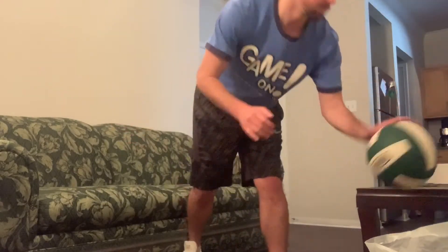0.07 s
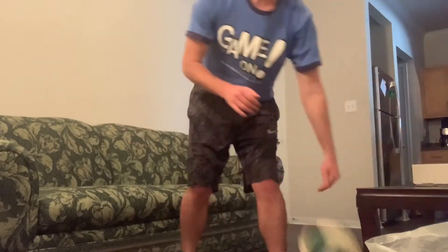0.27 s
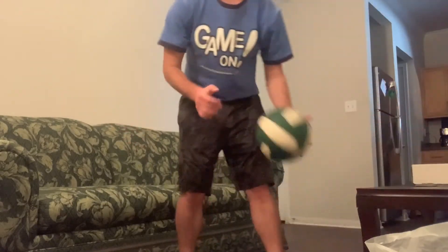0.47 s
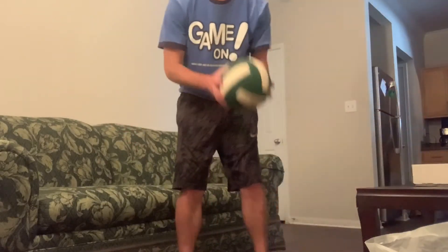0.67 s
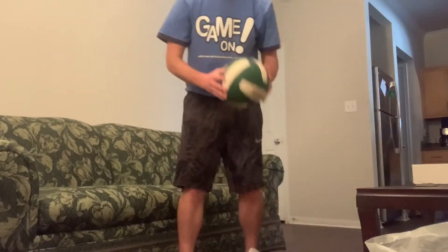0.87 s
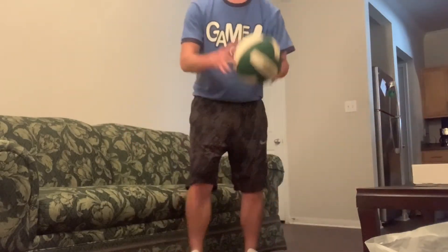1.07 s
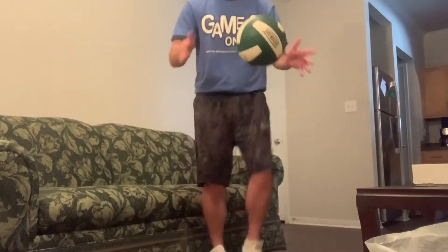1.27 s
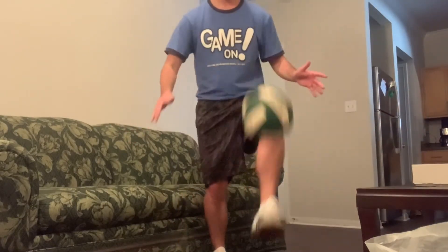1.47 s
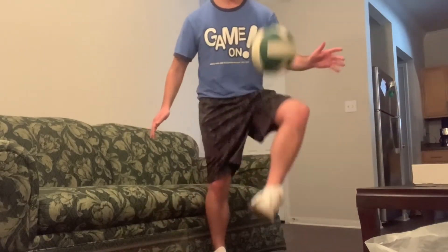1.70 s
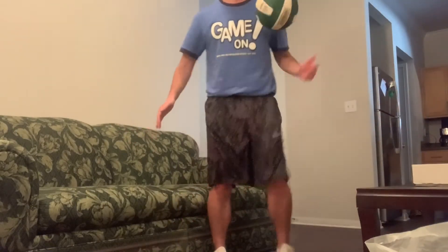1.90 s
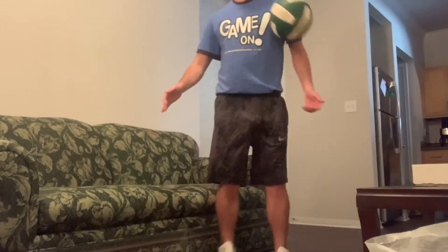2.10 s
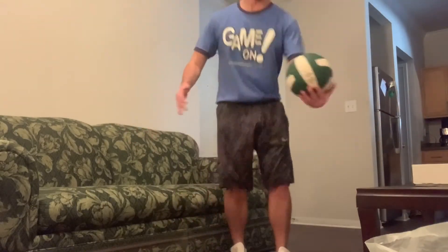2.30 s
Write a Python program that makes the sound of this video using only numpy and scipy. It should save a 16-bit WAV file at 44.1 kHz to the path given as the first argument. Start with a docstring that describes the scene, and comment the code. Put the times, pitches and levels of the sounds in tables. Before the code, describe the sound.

Ball bouncing once with a boomy thud, then slapping against hands and a knee indoors.

```python
"""Volleyball in a living room

The ball is dribbled on the floor, caught, tossed, bumped off a knee and caught again.
Each contact gives a slap, a thump that sags in pitch and a ring of the air in the ball; heavy ones
wake the room's boom. Palms and clothes rub on the cover; an appliance hums in the background."""
import sys
import numpy as np
from scipy import signal
from scipy.fft import rfft, irfft, next_fast_len
from scipy.io import wavfile

SR = 44100
rng = np.random.default_rng(int(sys.argv[2]) if len(sys.argv) > 2 else 0)


def unload_audio(sound):
    """Save the sound as a 16-bit wav file, at the path given as the first command line argument."""
    columns = np.transpose(np.atleast_2d(sound))
    # keep every value between -1 and 1, then stretch to whole-number steps
    steps = np.round(np.clip(columns, -1, 1) * 32767)
    wavfile.write(sys.argv[1], SR, steps.astype(np.int16))


N = 108045

# Frequencies in Hz of a contact's seven slap levels.
SLAP_BANDS_HZ = [200, 420, 750, 1250, 2300, 4600, 10000]


def amp(db):
    return 10 ** (np.asarray(db) / 20)


def unit_rms(x):
    return x / np.sqrt(np.mean(x ** 2) + 1e-20)


def curve_at(points, hz):
    """Interpolate (Hz, value) points on a log frequency axis."""
    points_hz, values = np.transpose(points)
    return np.interp(np.log(hz + 1), np.log(points_hz + 1), values)


def mix_in(out, start_s, x):
    """Add x to out from start_s on, cropped to the scene."""
    i = round(start_s * SR)
    x = x[..., max(-i, 0):N - i]
    out[:, max(i, 0):max(i, 0) + x.shape[-1]] += x


def room_noise(gain, size):
    """Stereo noise shaped by gain(hz): alike on both sides in the bass, partly alike above."""
    # Each row: frequency in Hz, left-right correlation.
    likeness = [(60, 1), (130, 0.9), (240, 0.92), (380, 0.18), (800, 0.3), (3000, 0.36), (7500, 0.55),
                (9000, .3), (11000, 0.697), (13000, 0.95), (15000, 1)]
    # Each row: frequency in Hz, lag of the left channel in seconds.
    left_lag = [(180, 0), (450, .001), (1100, .0009), (2350, .00085), (5150, .000777), (9000, .000745),
                (11200, .000714), (14600, .000685)]
    hz = np.fft.rfftfreq(size, 1 / SR)
    angle = np.arccos(np.clip(curve_at(likeness, hz), -1, 1)) / 2
    mid, side = rfft(rng.standard_normal((2, size))) * gain(hz) * [np.cos(angle), np.sin(angle)]
    left = (mid + side) * np.exp(-2j * np.pi * hz * curve_at(left_lag, hz))
    return irfft(np.array([left, mid - side]), size)


def background():
    """An appliance motor hums over the room's soft rush."""
    # Each row: frequency in Hz, rms level in dB.
    hum_tones = [(59.2, -57), (118.4, -64), (236.9, -66.5)]
    # Each row: frequency in Hz, relative level in dB.
    rush_spectrum = [(12, -13), (20, -7.5), (65, -0.5), (163, -24), (248, -8.5), (337, -14.5), (718, -19.5),
                     (1440, -32), (3740, -41), (4420, -42), (5230, -40.5), (14700, -54.5), (16000, -72)]
    rush_db = -53
    t = np.arange(N) / SR
    hum = sum(amp(db) * np.sqrt(2) * np.sin(2 * np.pi * hz * t + rng.uniform(0, 2 * np.pi))
              for hz, db in hum_tones)
    rush = room_noise(lambda hz: amp(curve_at(rush_spectrum, hz)), next_fast_len(N))[:, :N]
    return hum + amp(rush_db) * unit_rms(rush)


def rubs():
    """Skin and cloth brush the cover: short hisses that fade in the room."""
    # Each row: start, rise and hold in seconds, level in dB, centre in Hz, half-width in octaves.
    # In order: finger squeak, palm slide, shirt (two rows), forearm, shorts.
    strokes = [ (0.53, 0.0037, 0.0042, -56.5, 2410, .1), (0.754, 0.028, 0.047, -54, 7220, 0.77),
               (1.861, 0.034, .02, -55.5, 2200, 0.62), (1.871, .015, 0.011, -61.5, 7600, 0.37),
               (2.173, 0.0067, 0.027, -53.5, 6600, 0.35), (1.534, 0.0069, .005, -47.5, 3850, 0.17), ]
    t60_s = 0.373
    out, t = np.zeros((2, N)), np.arange(SR) / SR
    for start_s, rise_s, hold_s, db, centre_hz, width_oct in strokes:
        envelope = np.minimum(t / rise_s, 1) * amp(-60 * np.maximum(t - rise_s - hold_s, 0) / t60_s)
        hiss = room_noise(lambda hz: 1 / (1 + (np.log2((hz + 1) / centre_hz) / width_oct) ** 2), len(t))
        mix_in(out, start_s, amp(db) * envelope * unit_rms(hiss))
    return out


def boom(t):
    """The room's lowest standing wave swells as the thump dies, then hangs on."""
    mode_hz, rise_s, t60_s = 62.18, 0.18, 0.68
    swell = 1 - np.exp(-(t / rise_s) ** 4)
    return np.sin(2 * np.pi * mode_hz * t) * swell * amp(-60 * t / t60_s)


def ring(t, slap_spectrum, rise_s):
    """The air in the ball and the room ring as hard as the slap drives them; each tone wavers."""
    # Each row: frequency in Hz, relative level in dB, t60 in seconds.
    modes = [(286.5, -1, 0.66), (445, -8, 0.14), (524, -7.5, .45), (579, 5.5, 0.29), (705, 5.5, 0.32),
             (731, -8, 0.96), (910.4, 1, 0.4), (1025, -9, 0.2), (1136, -2, 0.36), (1226, -7, 0.45),
             (1506, -7, 0.47), (1525, -14.5, 0.13), (1889, -7.5, 0.57), (2250, -8, 0.35)]
    coupling_db, waver_rad = -4, 0.37
    knots_s = np.arange(0, 1, 0.025)
    out = np.zeros((2, len(t)))
    for hz, db, t60_s in modes:
        envelope = amp(coupling_db + db + curve_at(slap_spectrum, hz) - 60 * t / t60_s)
        for channel in out:
            drift = waver_rad * rng.standard_normal(len(knots_s)).cumsum()
            phase = np.interp(t, knots_s, drift) + rng.uniform(0, 2 * np.pi)
            channel += envelope * np.sin(2 * np.pi * hz * t + phase)
    return out * (1 - np.exp(-t / rise_s))


def tock(t, slap_db):
    """The first touch chirps down as the contact patch widens."""
    start_hz, decay_s, over_mids_db = 3100, 0.001854, 0.5
    fade = np.exp(-t / decay_s)
    envelope = amp(over_mids_db + np.mean(slap_db[2:5])) * 4 * fade * (1 - fade)
    return envelope * np.sin(2 * np.pi * start_hz * decay_s * (1 - fade))


def slap(t, slap_spectrum, rise_s):
    """The cover's smack, thrown back by near walls, then dying in the room."""
    # Colour common to all slaps. Each row: frequency in Hz, gain in dB.
    colour = [(40, -8.5), (110, -1.5), (280, -6.5), (345, -11), (440, 0.5), (700, -2), (900, -5),
              (1500, -5), (2000, -2), (2600, -5), (3500, -4), (4100, -4.5), (4900, -0.5), (5600, -1.5),
              (7500, 0), (10200, -3.5), (11200, -1.5), (12400, -6), (15000, -5.5)]
    # Each row: frequency in Hz, room t60 in seconds.
    room_t60 = [(100, 0.64), (250, 0.47), (600, 0.65), (1500, 0.61), (3000, 0.61), (5200, 0.66),
                (8000, 0.55), (14000, 0.41)]
    crack_db, crack_s = -3.5, 0.0013
    walls_db, walls_s = 0.5, 0.029

    def gain(hz):
        per_octave = np.sqrt(SR / (2 * np.log(2) * (hz + 20)))
        return amp(curve_at(slap_spectrum, hz) + curve_at(colour, hz)) * per_octave

    hz, age_s, frames = signal.stft(room_noise(gain, len(t)), SR, nperseg=512)
    decay = amp(-60 * age_s / curve_at(room_t60, hz)[:, None])
    burst = signal.istft(frames * decay, SR, nperseg=512)[1][:, :len(t)]
    early_boost = 1 + amp(crack_db) * np.exp(-t / crack_s) + amp(walls_db) * np.exp(-t / walls_s)
    return burst * early_boost * (1 - np.exp(-t / rise_s))


def thump(t, end_hz, t60_s):
    """The ball flattens and springs back: a low push whose pitch sinks fast."""
    sag_hz, sag_s, rise_s = 604, 0.003653, 0.011
    cycles = end_hz * t + sag_hz * sag_s * (1 - np.exp(-t / sag_s))
    attack = 1 - np.exp(-(t / rise_s) ** 2)
    return -np.cos(2 * np.pi * cycles) * attack * amp(-60 * t / t60_s)


def ball():
    """The ball meets floor, hands and body; the far wall returns the bass of each thump."""
    # Each row: start and slap rise in seconds, seven slap levels in dB, thump level in dB,
    # thump end pitch in Hz, thump t60 and delay in seconds, boom level in dB.
    # In order: floor (tail only), hand, floor, left hand, palm, grip (two rows), toss (two rows),
    # knee, chest (two rows), forearm, catch.
    contacts = [ (-.32, .001, -24, -24, -24, -24, -24, -24, -19, -3, 66, .2, 0, -0.5),
                (0.0452, 0.0009, -32.5, -47.5, -43, -47.5, -45.5, -48.5, -46, -16, 64.8, 0.13, 0.0039, -45),
                (0.1965, 0.00039, -22, -27.5, -26, -25.5, -25, -29.5, -33.5, 4, 66.8, 0.13, 0.00066, -9),
                (.546, 0.0036, -41, -54, -55.5, -55.5, -54.5, -55.5, -58, -31.5, 240, 0.14, 0, -60),
                (.584, 0.0013, -44, -47.5, -49, -50, -54.5, -57, -56.5, -12.5, 83.2, 0.08, 0.00059, -59),
                (0.885, 0.003, -48.5, -62, -56.5, -69, -67, -68.5, -83, -47, 118, 0.12, 0.0079, -36),
                (1.025, 0.0038, -70, -78, -84, -68, -76, -72.5, -77, -65, 115, 0.044, 0.0038, -46),
                (1.190, 0.0023, -46.5, -44.5, -48.5, -49, -76, -66, -60, -33.5, 244.4, 0.19, 0, -55),
                (1.2202, 0.0058, -44.5, -44.5, -49.5, -47.5, -54, -56, -58.5, -43.5, 73.7, 0.33, 0.0015, -58),
                (1.522, 0.00058, -35, -41.5, -37, -35.5, -46, -46.5, -49, -6.5, 64.7, .19, 0, -15),
                (1.8553, 0.0045, -47, -45.5, -46.5, -52.5, -47, -65.5, -66.5, -24, 92, 0.097, 0, -72.5),
                (1.956, 0.0089, -68, -56, -67, -62.5, -60.5, -57.5, -68.5, -47, 110, 0.08, 0.0085, -71),
                (2.1627, 0.0028, -47.5, -43, -46, -60.5, -62.5, -59, -56.5, -33, 249, 0.13, 0, -73),
                (2.2579, 0.001, -39.5, -38, -36.5, -41.5, -47, -48, -44, -21, 116.7, .11, 0.00075, -28), ]
    slap_pan, thump_pan = amp([[-0.64], [0.64]]), amp([[0.83], [-0.83]])
    echo_s, echo_db = 0.042, -7
    echo_lowpass = signal.butter(2, 150, fs=SR, output="sos")
    out, t = np.zeros((2, N)), np.arange(SR) / SR
    for start_s, rise_s, *slap_db, thump_db, end_hz, t60_s, delay_s, boom_db in contacts:
        slap_spectrum = list(zip(SLAP_BANDS_HZ, slap_db))
        smack = tock(t, slap_db) + slap(t, slap_spectrum, rise_s) + ring(t, slap_spectrum, rise_s)
        mix_in(out, start_s, smack * slap_pan)
        push = amp(thump_db) * thump(t, end_hz, t60_s)
        mix_in(out, start_s + delay_s, (push + amp(boom_db) * boom(t)) * thump_pan)
        mix_in(out, start_s + delay_s + echo_s, amp(echo_db) * signal.sosfilt(echo_lowpass, push))
    return out


def scene():
    return ball() + rubs() + background()


def record(dry):
    """Thin the deepest bass and cut the top treble."""
    low_cut_hz, top_hz, taper_hz = 8.9, 15500, 800
    size = next_fast_len(N + SR // 2)
    hz = np.fft.rfftfreq(size, 1 / SR)
    highpass = hz / np.hypot(hz, low_cut_hz)
    lowpass = np.clip((top_hz - hz) / taper_hz + 0.5, 0, 1)
    return irfft(rfft(dry, size) * highpass * lowpass, size)[:, :N]


dry = scene()
out = record(dry)
unload_audio(out)
```